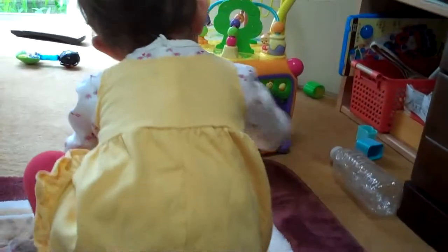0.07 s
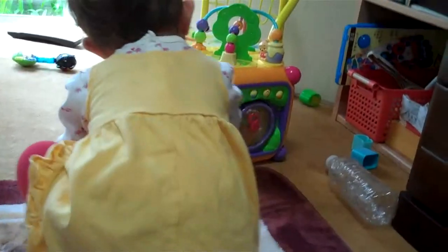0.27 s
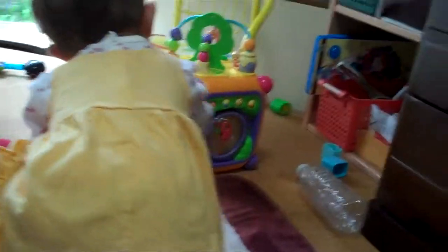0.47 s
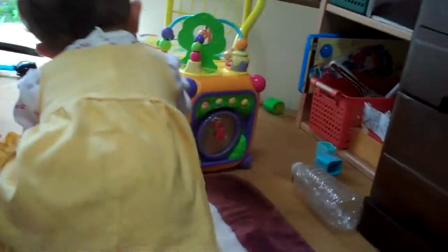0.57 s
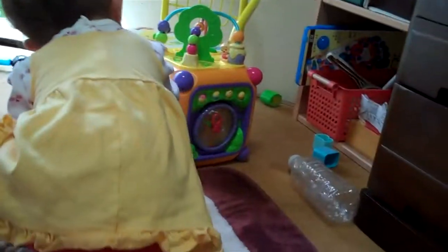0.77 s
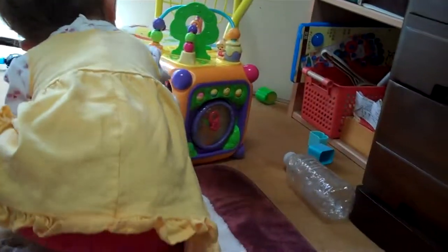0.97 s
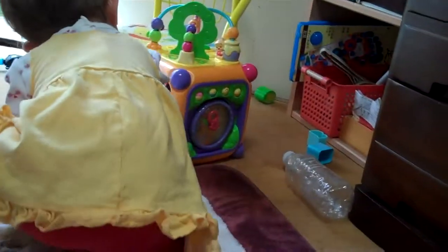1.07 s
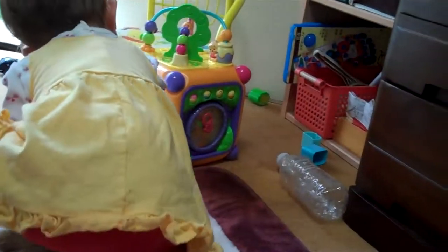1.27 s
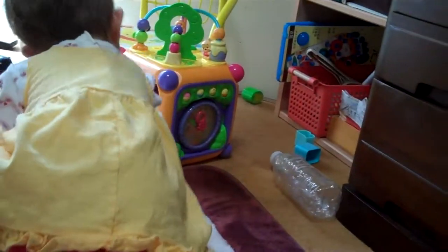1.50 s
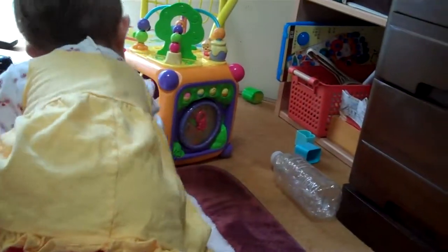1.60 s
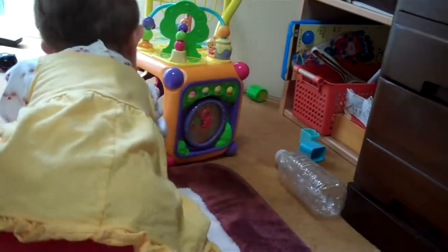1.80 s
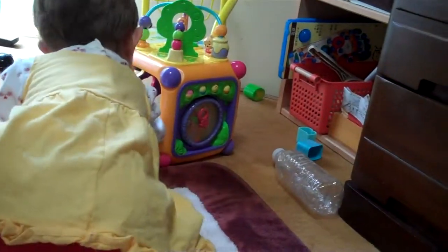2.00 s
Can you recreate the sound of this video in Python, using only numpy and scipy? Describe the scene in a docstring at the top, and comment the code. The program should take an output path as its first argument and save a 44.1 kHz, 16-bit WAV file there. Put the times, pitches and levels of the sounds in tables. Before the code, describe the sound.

An empty plastic bottle is knocked about on a wooden floor. At 0.2 seconds it gives a hard, bright snap that just overloads the microphone. A short scrape with a tick and a light knock follows around 0.6. Two loud hollow knocks land near 0.95 and 1.1, with a rubbing rustle. Softer clatter and rustling run from 1.4 to 1.8, over the small room's faint hiss.

```python
"""A hard snap, then a short scrape, two loud hollow knocks and a softer clatter over a rubbing rustle:
hollow plastic knocked about on the wooden floor of a small room. Each knock sounds the cavity,
the thin walls and a bright click, as decaying noise plus ringing modes; scrape and rustle are noise
with tiny slips. The room hisses and answers briefly, and the snap just overloads the microphone."""
import sys
import numpy as np
from scipy.fft import rfft, irfft, next_fast_len
from scipy.io import wavfile

SR = 44100
rng = np.random.default_rng(int(sys.argv[2]) if len(sys.argv) > 2 else 0)


def put_to_file(sound):
    """Save the sound as 16-bit audio at rate SR, in the file named by the first command-line argument."""
    columns = np.atleast_2d(sound).T  # one column per channel
    safe = np.clip(columns, -1, 1)
    whole_steps = np.round(safe * 32767)
    wavfile.write(sys.argv[1], SR, whole_steps.astype(np.int16))


N = 90404
HIT_SAMPLES = 16384
HIT_TIME_S = np.arange(HIT_SAMPLES) / SR


def amp(db):
    """Decibels to gain."""
    return 10 ** (np.asarray(db) / 20)


def unit(x):
    """Scale to rms 1."""
    return x / np.sqrt(np.mean(x ** 2) + 1e-20)


def along(points, hz):
    """Read (freq_hz, value) points on a log axis."""
    freqs, values = np.transpose(points)
    return np.interp(np.log(hz + 1), np.log(freqs + 1), values)


def fade(t60_s, rise_s):
    """Quick rise, exponential decay."""
    return np.exp(-np.log(1000) * HIT_TIME_S / t60_s) * (1 - np.exp(-HIT_TIME_S / rise_s))


def pan(db):
    """Stereo gains, left over right by db."""
    return amp(np.array([[db], [-db]]) / 2)


def add(out, start_s, sound):
    """Mix in one hit."""
    part = out[:, round(start_s * SR):][:, :HIT_SAMPLES]
    part += sound[:, :part.shape[1]]


def resonance(hz, peak):
    """Gain of a struck panel: a peak on sloping skirts."""
    centre_hz, width_hz, peak_db, skirt_db_per_octave = peak
    octaves = np.abs(np.log2((hz + 1) / centre_hz))
    return amp(peak_db / (1 + ((hz - centre_hz) / width_hz) ** 2) - skirt_db_per_octave * octaves)


def causal(gain, n_fft):
    """Minimum-phase response: rings only after it is struck."""
    cepstrum = irfft(np.log(np.maximum(gain, 1e-6)), n_fft)
    return np.exp(rfft(np.concatenate([cepstrum[:1], 2 * cepstrum[1:n_fft // 2]]), n_fft))


# Stereo width: freq_hz, side_over_mid_db
WIDTH = [(30, -24), (120, -4.5), (350, -17), (700, -14), (1400, -9.5), (2800, -4.5), (5500, -1), (12000, 0)]

def colour(pair, spectrum, peak=None):
    """Filter two signals into stereo of rms 1, wider in the treble, with an optional resonance."""
    size = pair.shape[1]
    n_fft = next_fast_len(size)
    hz = np.fft.rfftfreq(n_fft, 1 / SR)
    response = causal(amp(along(spectrum, hz)) * (resonance(hz, peak) if peak else 1), n_fft)
    width = amp(along(WIDTH, hz))
    mid_share = 1 / np.hypot(1, width)
    shares = np.array([mid_share, width * mid_share])
    mid, side = irfft(rfft(pair, n_fft) * response * shares, n_fft)[:, :size]
    return unit(np.array([mid + side, mid - side]))


def burst(spectrum, t60_s, rise_s, peak=None):
    """Decaying noise through a body's resonances; the envelope sets the energy."""
    envelope = fade(t60_s, rise_s)
    noise = rng.standard_normal((2, HIT_SAMPLES)) * envelope
    return colour(noise, spectrum, peak) * np.sqrt(np.mean(envelope ** 2))


def ring(modes, t60_s, rise_s, scatter_db, peak=None):
    """Decaying modes, struck differently each time; an optional peak favours those near it."""
    hz, db = np.transpose(modes)
    weights = unit(resonance(hz, peak)) if peak else 1
    gains = weights * amp(db + scatter_db * rng.standard_normal(len(hz)))
    spread = rng.choice([-1, 1], len(hz)) * np.arctan(amp(along(WIDTH, hz)))
    phases = 2 * np.pi * (np.outer(HIT_TIME_S, hz) + rng.random(len(hz)))
    tones = np.array([np.sin(phases + spread) @ gains, np.sin(phases - spread) @ gains])
    return tones * fade(t60_s, rise_s)


def friction(levels, spectrum, slips_per_s, smear_db):
    """Tiny random slips of plastic, plus noise for the room's smear."""
    time_s, level_db = np.transpose(levels)
    envelope = np.interp(np.arange(N) / SR, time_s, amp(level_db), left=0)
    slips = (rng.random(N) < slips_per_s / SR) * rng.standard_normal((2, N))
    smear = amp(smear_db) * rng.standard_normal((2, N))
    return envelope * colour(unit(slips) + smear, spectrum)


# Room noise: freq_hz, gain_db
HISS_SPECTRUM = [(15, -34), (25, -7), (98, 2), (200, -5), (450, -5.5), (700, -7.5), (950, -5), (1300, -7),
                 (4000, -10.5), (6000, -4.5), (7500, -6), (10000, -21), (14000, -19), (14700, -55)]

def room_hiss():
    """Quiet, steady noise of the room."""
    return amp(-54.5) * colour(rng.standard_normal((2, N)), HISS_SPECTRUM)


# Rubbing envelope: time_s, level_db
RUSTLE_LEVELS = [(.85, -79), (.9, -82), (1.08, -45.5), (1.12, -37), (1.17, -37.5), (1.23, -46), (1.33, -68),
                 (1.4, -71), (1.53, -56.5), (1.6, -47), (1.69, -36.5), (1.8, -52), (1.9, -69), (1.98, -56),
                 (2.01, -52.5), (2.05, -59)]
# Rubbing colour: freq_hz, gain_db
RUSTLE_SPECTRUM = [(100, -32), (350, 3.5), (900, 7), (2200, -3), (3500, -6), (7500, -2.5), (10000, -30.5),
                   (13800, -32), (14700, -60)]

def rustle():
    """Plastic rubs: a mostly smooth, noisy rustle with a little grain."""
    return friction(RUSTLE_LEVELS, RUSTLE_SPECTRUM, slips_per_s=270, smear_db=2.5)


# Sliding envelope: time_s, level_db
SCRAPE_LEVELS = [(.44, -88), (.5, -61), (.56, -51), (.59, -48), (.65, -49), (.68, -75)]
# Sliding colour: freq_hz, gain_db
SCRAPE_SPECTRUM = [(300, -50), (1500, -14), (1800, 9.5), (2150, -15), (3500, -9), (6000, -2.5), (7600, -14),
                   (10000, -30), (15000, -40)]

def scrape():
    """Plastic slides briefly: dense slips blur together."""
    return friction(SCRAPE_LEVELS, SCRAPE_SPECTRUM, slips_per_s=1200, smear_db=9)


# Tick colour: freq_hz, gain_db
TICK_SPECTRUM = [(100, -33), (700, -6), (1300, -12.5), (2000, -2), (3200, -5), (4400, -8), (5300, 0.5),
                 (7500, 2), (9000, -11), (15000, -18)]

def tick(start_s=0.5526):
    """One dry tick right beside the microphone."""
    out = np.zeros((2, N))
    add(out, start_s, amp(-20) * burst(TICK_SPECTRUM, t60_s=0.0064, rise_s=0.00025) * pan(7.5))
    return out


# Floor under a blow: freq_hz, gain_db
FLOOR_SPECTRUM = [(25, -17), (90, -3), (180, -1), (400, -13.5), (1000, -24), (4000, -62)]

def floor_thump():
    """The wooden floor takes a blow: low and short."""
    return burst(FLOOR_SPECTRUM, t60_s=0.025, rise_s=0.0012)


# Direct snap, its room return, the plastic's cavity: freq_hz, gain_db
SNAP_SPECTRUM = [(30, -18), (400, -23.5), (850, -30), (1150, -11), (1400, -13), (1850, 8), (2350, -4),
                 (3000, -66), (3900, -6), (4600, -12.5), (5400, 0.5), (6700, 0), (7800, -15), (10000, -24),
                 (14000, -25), (15500, -52)]
SNAP_ROOM_SPECTRUM = [(30, -28), (200, -25), (400, -18), (900, -22.5), (1120, -9), (1500, -6), (1950, 4.5),
                      (2700, -6), (3700, 1.5), (4600, -3.5), (5500, -0.5), (7200, -5.5), (9000, -20),
                      (13800, -32), (14700, -52)]
CAVITY_SPECTRUM = [(30, -24), (110, -28), (165, -13), (205, -24.5), (240, -8.5), (290, -8), (380, 0),
                   (490, -0.5), (650, -3), (900, -1.5), (1250, -4.5), (2500, -47), (9000, -90)]
# Bounces, room return relative to the snap's: start_s, level_db
BOUNCES = [(.256, -20), (0.304, -22)]

def snap(snap_s=0.2049):
    """Stiff plastic snaps, hard and bright, and bounces twice; the cavity booms faintly."""
    out = np.zeros((2, N))
    for start_s, level_db in [(snap_s, 0)] + BOUNCES:
        # On a bounce the crack drops further than the room return.
        crack = amp(3 + level_db / 2) * burst(SNAP_SPECTRUM, t60_s=0.015, rise_s=0.00076)
        room = amp(-15.5) * burst(SNAP_ROOM_SPECTRUM, t60_s=0.24, rise_s=0.00067)
        add(out, start_s, amp(level_db) * (crack + room))
    add(out, snap_s, amp(-39) * floor_thump())
    add(out, snap_s, amp(-39.5) * burst(CAVITY_SPECTRUM, t60_s=0.47, rise_s=0.019))
    return out


# Radiation of the thin walls and the click: freq_hz, gain_db
WALL_SPECTRUM = [(100, -56), (300, -17.5), (750, -24), (1050, -8), (1450, -7), (1750, -5), (2300, -1.5),
                 (2900, -4), (3600, -8.5), (5000, -18), (10000, -58), (15000, -80)]
CLICK_SPECTRUM = [(200, -72), (1000, -43), (2800, -19.5), (3800, -3), (5000, -3.5), (6200, -1.5),
                  (7600, -3), (8600, -13.5), (10000, -24), (13800, -29), (14700, -55)]
# Modes of each part: pitch_hz, level_db
CAVITY_MODES = [(232, -20.5), (335, -12), (398, -2), (553, -11.5), (845, -11.5), (975, -7.5)]
WALL_MODES = [(1329, -7.5), (1482, -8), (1842, -5), (1993, -9), (2111, -4.5), (2262, -6), (2417, -5.5),
              (2586, -10.5), (2891, -2.5)]
CLICK_MODES = [(4140, -4), (4560, -4), (4790, 2), (4926, -3), (5378, -4), (5950, -5), (6510, -5), (7176, 0),
               (7461, -2), (7860, -3)]
# Contacts, with relative gains:
# start_s, cavity_db, wall_db, click_db, wall_hz, click_hz, attack_db, hollow_db, click_pan_db
KNOCKS = [(.630, -48.5, -66, -70, 1850, 5280, -15, -16, -10.5),
          (.658, -49, -34.5, -37.5, 2170, 3810, -5.5, -10, 1),
          (.892, -76, -51.5, -52, 1550, 5570, 3.5, -8, 2), (.921, -40.5, -46, -43, 1300, 5000, -14, -17, 8),
          (.930, -31.5, -27, -34, 1120, 5350, 0, -2.5, 7.5),
          (0.9567, -24, -13, -16.5, 1460, 4710, 0, -0.5, 5),
          (1.091, -24, -22, -16, 2560, 6870, 2.5, -3.5, 1.5),
          (1.122, -41.5, -25.5, -22, 2860, 5370, -5, 3, -3),
          (1.147, -33.5, -31, -32.5, 2500, 4440, -3, 6, 16),
          (1.248, -47, -42.5, -56.5, 1500, 4830, 3, -12, 6), (1.271, -64, -62, -50.5, 1510, 6500, 4, 8, -3),
          (1.285, -73, -71, -61.5, 1550, 8000, 15.5, -14, 0), (1.36, -88, -70, -54, 2000, 4280, 1.5, -8, 2),
          (1.378, -72, -75, -50.5, 2000, 4300, -1, -10, 4),
          (1.399, -48.5, -51, -54.5, 2080, 6940, 0, -14.5, 4),
          (1.4237, -44.5, -34.5, -46, 1980, 6460, -3, -1.5, 9),
          (1.462, -46.5, -51, -44.5, 2040, 7500, -1, -9, -1),
          (1.542, -32.5, -33.5, -36.5, 1280, 4440, 1.5, -25, -0.5),
          (1.577, -62, -33.5, -26.5, 1500, 4950, -2, -8, 9.5),
          (1.598, -35, -31, -33, 2250, 5000, 2, 0.5, -3), (1.621, -32, -47, -30.5, 1300, 7600, 0, -3, 7),
          (1.648, -33.5, -28, -31.5, 2720, 7000, 4.5, -12, -1),
          (1.674, -38.5, -41, -39.5, 2160, 4000, 8.5, -12, 1),
          (1.7257, -32.5, -34.5, -41, 1300, 6600, 6, -12, 1.5),
          (1.777, -34, -37.5, -32.5, 2120, 7520, 3.5, -21, 10.5),
          (1.786, -34.5, -33.5, -34.5, 2040, 6900, 1.5, -14, 1)]

def knocks():
    """Each contact thumps the floor, rings the cavity and walls, clicks, and dies away in the room."""
    out = np.zeros((2, N))
    for start_s, cavity_db, wall_db, click_db, wall_hz, click_hz, attack_db, hollow_db, pan_db in KNOCKS:
        # centre_hz, width_hz, peak_db, skirt_db_per_octave
        wall_peak = (wall_hz, 95, 8.5, 1)
        click_peak = (click_hz, 550, 7.5, 3)

        cavity = amp(-1) * burst(CAVITY_SPECTRUM, t60_s=0.23, rise_s=0.0015)
        cavity += amp(-15.5) * floor_thump()
        cavity += amp(hollow_db) * ring(CAVITY_MODES, t60_s=0.27, rise_s=0.0035, scatter_db=1)

        wall = amp(-3) * burst(WALL_SPECTRUM, t60_s=0.27, rise_s=0.0022, peak=wall_peak)  # room tail
        wall += amp(-9) * ring(WALL_MODES, t60_s=0.27, rise_s=0.0019, scatter_db=2, peak=wall_peak)
        wall += amp(attack_db + 4.5) * burst(WALL_SPECTRUM, t60_s=0.027, rise_s=0.00043, peak=wall_peak)

        tail = amp(-2) * burst(CLICK_SPECTRUM, t60_s=0.26, rise_s=0.0043, peak=click_peak)
        tail += amp(-14) * ring(CLICK_MODES, t60_s=0.21, rise_s=0.001, scatter_db=4, peak=click_peak)
        attack = amp(attack_db + 10) * burst(CLICK_SPECTRUM, t60_s=0.027, rise_s=0.0016, peak=click_peak)
        click = attack * pan(pan_db) + tail * pan(pan_db / 2)

        add(out, start_s, amp(cavity_db) * cavity + amp(wall_db) * wall + amp(click_db) * click)
    return out


def scene():
    """Friction and blows over the room's hiss."""
    return room_hiss() + scrape() + rustle() + snap() + tick() + knocks()


# Microphone port imbalance: freq_hz, left_over_right_db
PORT_BALANCE = [(30, 0), (300, 2.5), (1200, 2.1), (5000, -2), (7000, 5), (9000, 14), (11000, 6),
                (14000, 3.5)]

def record(dry, cutoff_hz=15900):
    """The left port hears more treble; the signal clips at full scale and is band-limited."""
    n_fft = next_fast_len(N + HIT_SAMPLES)
    hz = np.fft.rfftfreq(n_fft, 1 / SR)
    balance = amp(np.array([[1], [-1]]) * along(PORT_BALANCE, hz) / 2)
    clipped = np.clip(irfft(rfft(dry, n_fft) * balance, n_fft), -1, 1)
    lowpass = 1 / np.hypot(1, (hz / cutoff_hz) ** 60)
    return irfft(rfft(clipped) * lowpass, n_fft)[:, :N]


dry = scene()
out = record(dry)
put_to_file(out)
```